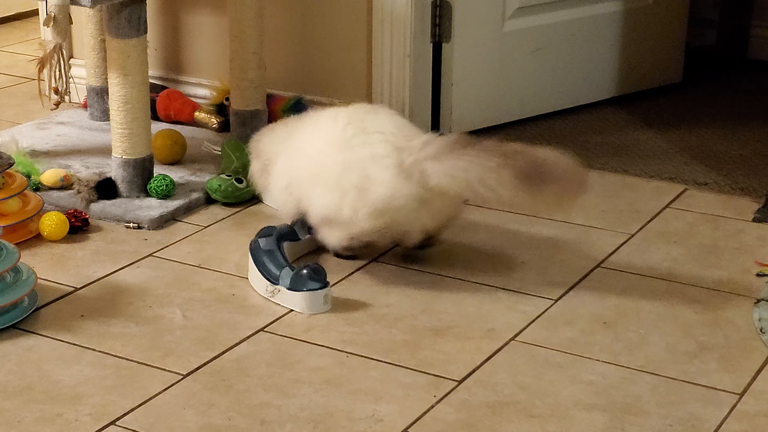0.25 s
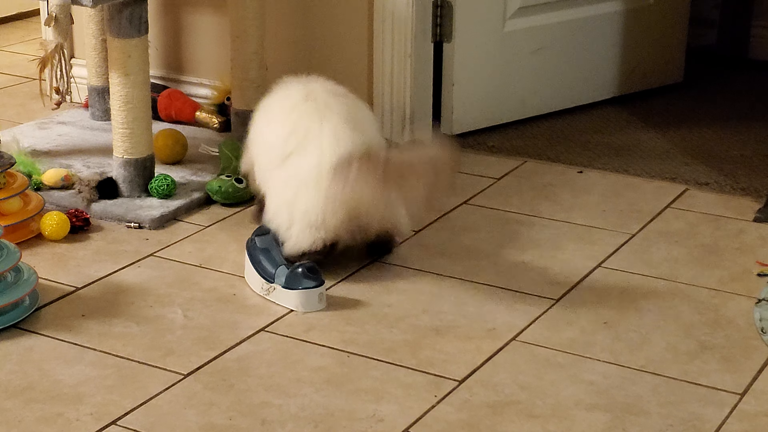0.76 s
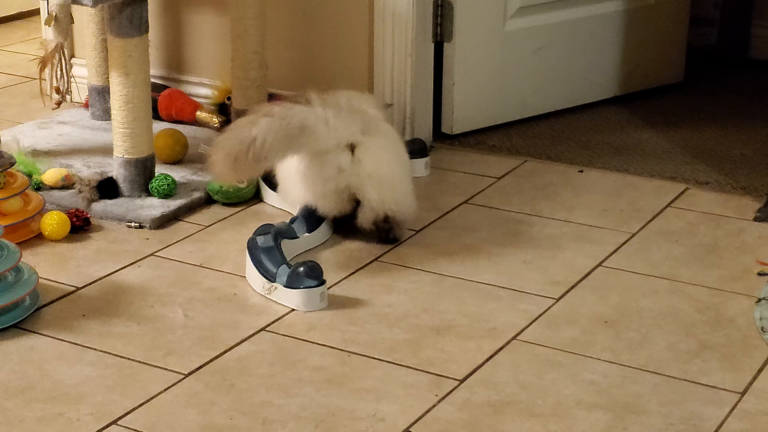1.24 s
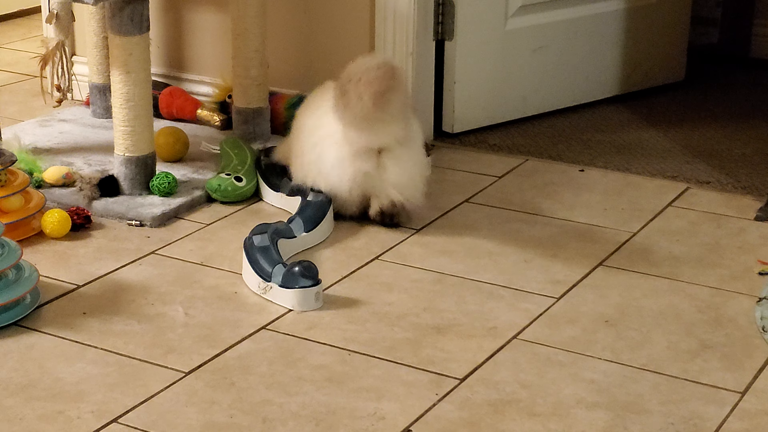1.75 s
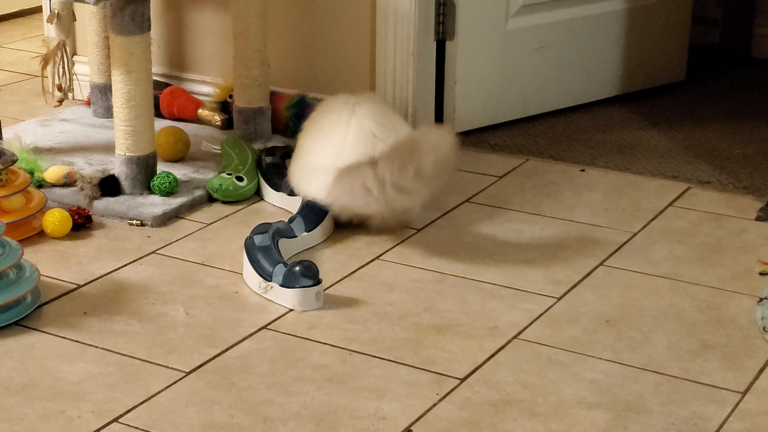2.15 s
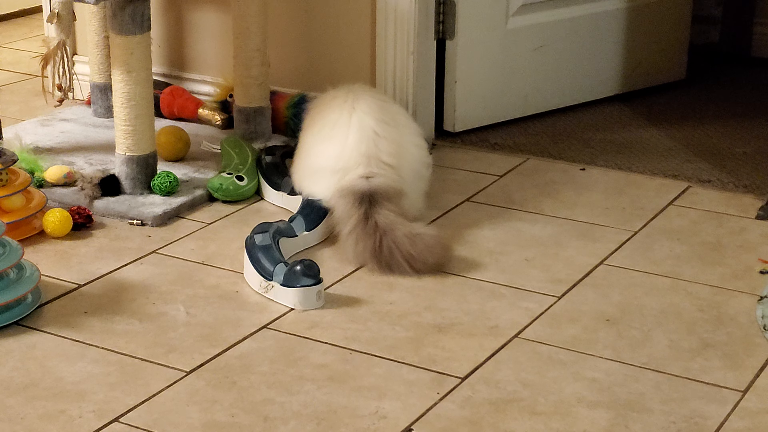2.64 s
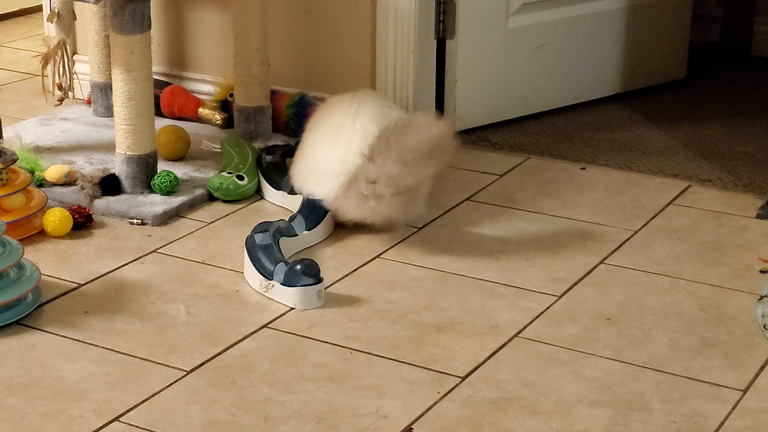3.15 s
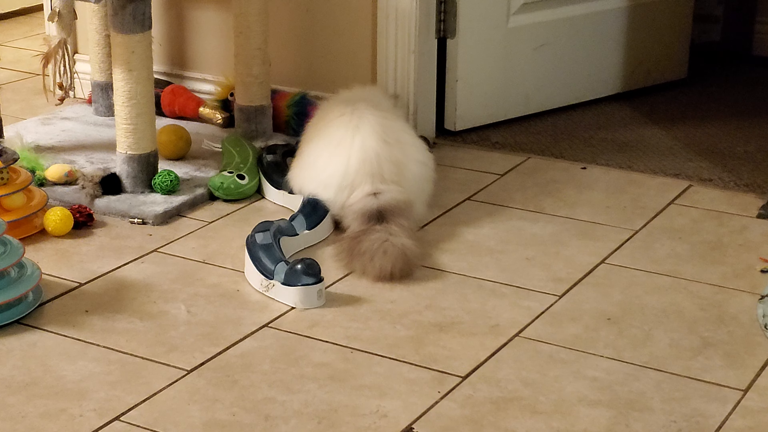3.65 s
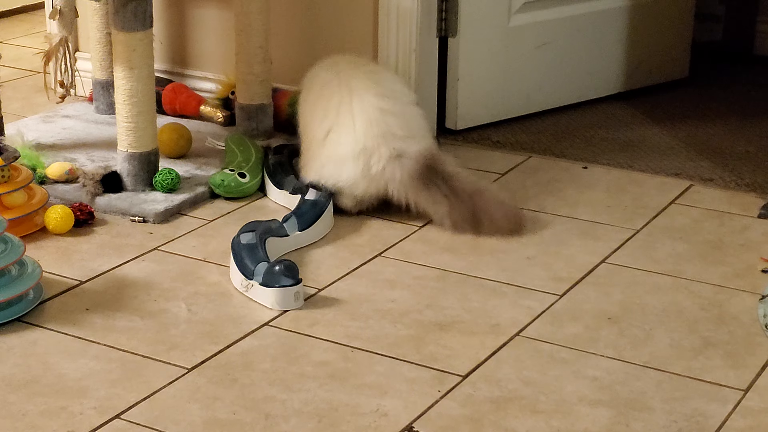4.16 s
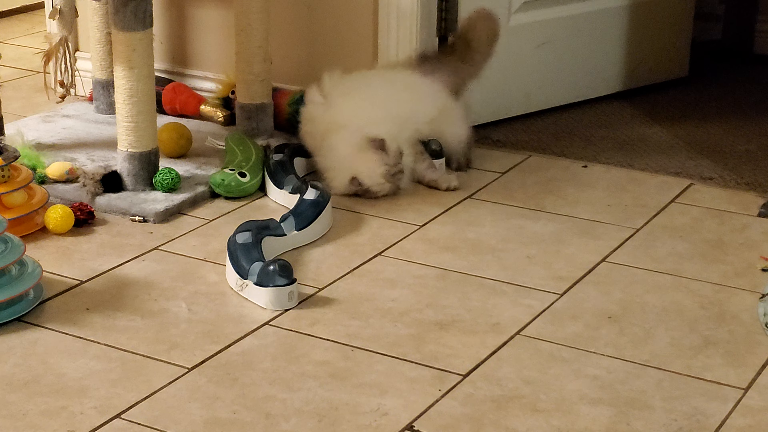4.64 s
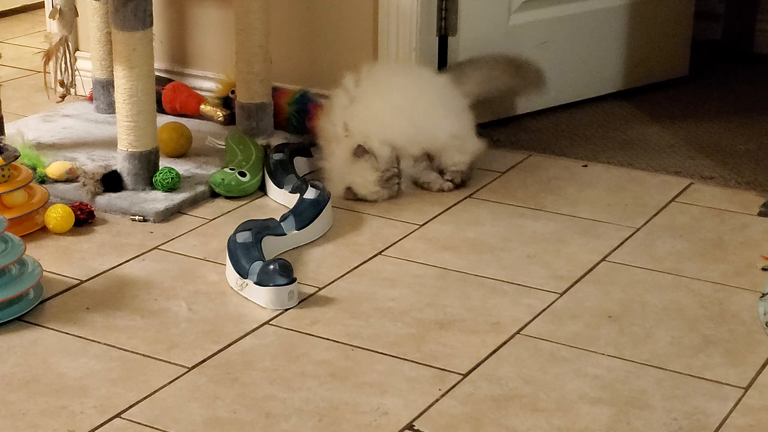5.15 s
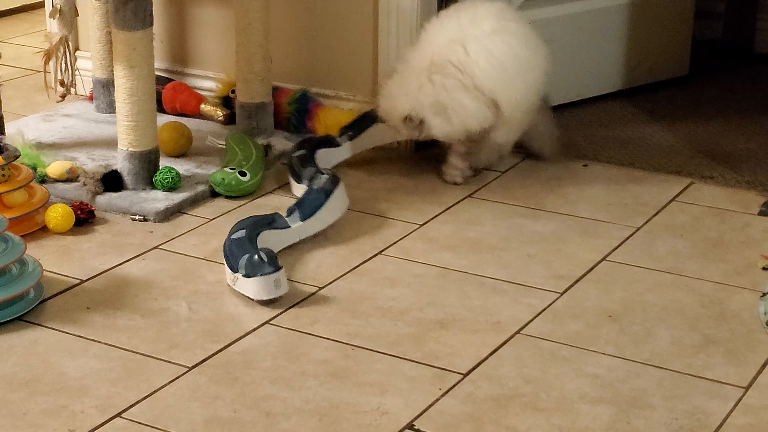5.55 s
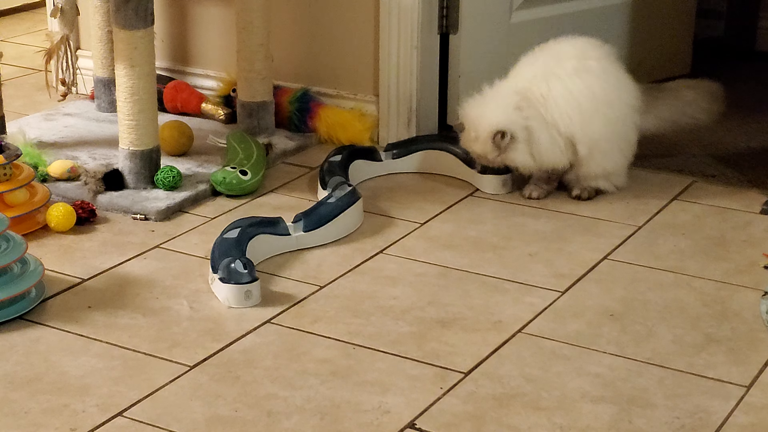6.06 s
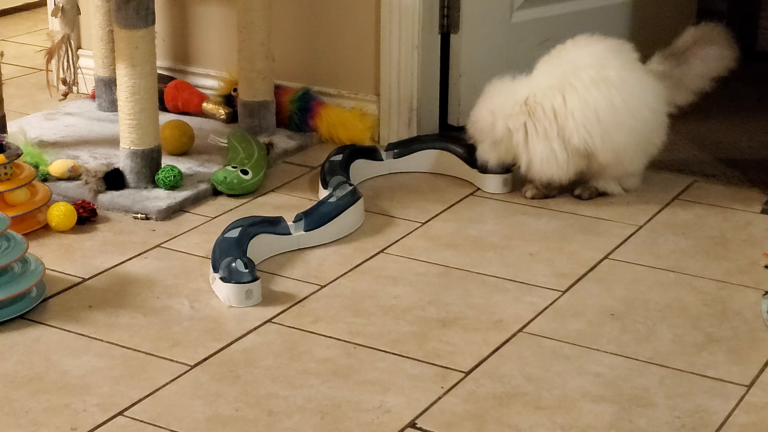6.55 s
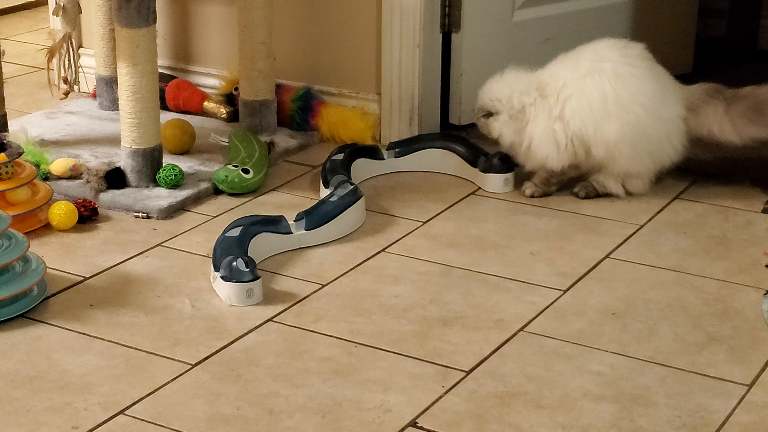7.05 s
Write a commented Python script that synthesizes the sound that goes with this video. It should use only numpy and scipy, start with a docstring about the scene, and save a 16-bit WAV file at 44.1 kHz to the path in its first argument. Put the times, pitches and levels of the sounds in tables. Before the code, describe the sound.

A kitten bats a hollow ball around a plastic track toy on a tiled floor. Quick clacks and short rolls mix with scrapes and a tiny squeak as the track is shoved. The play drops to light ticks, then several sharp, louder knocks arrive past the middle before it thins to soft taps. The microphone is a few metres away in a hard, slightly echoing room, where an appliance hums faintly.

```python
"""A hollow ball knocks around a plastic track toy, batted by a kitten a few metres from the microphone.
Each impact excites the damped resonances of the shell, and the ball rumbles along its channel.
When shoved, the track scrapes and squeaks over the floor tiles by stick-slip friction.
Reverberation in the hard room smears every sound; an appliance hums quietly behind it all."""
import sys
import numpy as np
from scipy import signal
from scipy.fft import rfft, irfft
from scipy.io import wavfile
from scipy.ndimage import uniform_filter1d

SR = 44100
rng = np.random.default_rng(int(sys.argv[2]) if len(sys.argv) > 2 else 0)


def to_wav(s):
    """Save 16-bit WAV."""
    ch = np.atleast_2d(s).T  # columns
    pcm = np.round(np.clip(ch, -1, 1) * 32767)  # PCM
    wavfile.write(sys.argv[1], SR, pcm.astype(np.int16))


N = 321930

# Tones of the appliance. Each row: frequency in Hz, level in dB.
HUM_TONES = [(59, -69), (117.7, -67), (177.6, -72), (398.4, -74.5), (705, -60)]
# Spectra of moving air, scraping, rolling and knocking. Each row: frequency in Hz, relative level in dB.
AIR_SPECTRUM = [(20, -41.5), (32, -22), (45, -10.5), (60, -0.5), (85, -18.5), (130, -8.5), (180, -12.5),
                (260, -8), (420, -10.5), (700, -15), (1200, -24.5), (1800, -32.5), (3300, -41), (4900, -39),
                (5600, -51.5), (8000, -54), (15000, -49)]
SCRAPE_SPECTRUM = [(80, -19), (500, -9.5), (1000, -0.5), (1600, -5.5), (2600, -0.5), (4700, -2.5),
                   (5600, -11.5), (6800, -13), (7900, -22.5), (10000, -19.5), (15500, -26.5)]
ROLL_SPECTRUM = [(60, -28.5), (200, -7), (450, -8.5), (650, 1), (1000, -1), (1500, -0.5), (2400, -8),
                 (3200, -15), (4800, -19), (5800, -37), (15000, -47)]
KNOCK_SPECTRUM = [(40, -12.5), (120, -5.5), (300, -5), (520, 0.5), (780, 2), (1200, 4.5), (2400, 1),
                  (3500, 0.5), (4800, -6), (5600, -11), (8000, -12), (10000, -11.5), (15500, -21.5)]
# Resonances of the hollow track. Each row: frequency in Hz, width in Hz, boost in dB.
SHELL_MODES = [(960, 15, 7.5), (949, 29, 1), (1070, 70, 1.5), (1384, 29, 6), (1532, 40, 2), (1647, 95, 3),
               (1823, 53, 1.5), (1972, 220, 5), (2200, 74, 2.5), (2382, 84, 5), (2780, 26, 1.5),
               (3077, 90, 1.5), (3240, 34, -0.5), (3600, 120, -1.5), (3975, 110, 0.5)]
# Shoves of the track, its squeaks, and runs of the ball along the channel; the shove row at 0.32 s is instead
# the bright grit that rides on the ball's rattle. Each row: start in seconds, length in seconds, first level in
# dB, last level in dB.
SHOVES = [(0.135, 0.11, -55, -42), (0.32, 0.13, -37.5, -55), (0.59, 0.11, -46.5, -40),
          (0.72, 0.1, -52.5, -48), (0.79, .12, -47, -32), (1.005, 0.038, -34, -35),
          (1.085, 0.067, -37.5, -34.5), (1.395, 0.1, -62, -44.5), (1.71, 0.079, -43.5, -47.5),
          (2.23, 0.21, -52.5, -68), (2.46, 0.12, -67, -57.5), (3.935, 0.09, -59, -53),
          (4.262, .05, -34, -38.5), (4.502, 0.051, -28, -36)]
SLIDE_SQUEAKS = [(0.819, 0.019, -41, -47.5), (0.877, 0.019, -37, -36)]
BALL_RUNS = [(0, 0.078, -36.5, -63), (0.12, .1, -48, -45), (0.305, 0.12, -34.5, -37),
             (0.45, 0.044, -40, -46), (0.6, 0.4, -45, -49.5), (1.25, 0.16, -55.5, -56),
             (1.415, 0.1, -47, -42), (2.01, 0.061, -54, -52), (2.235, 0.1, -38, -68),
             (2.455, 0.086, -39, -53), (2.75, 0.17, -63, -57), (3.57, 0.13, -70, -52),
             (3.87, 0.26, -58.5, -41.5), (5.5, 0.071, -38.5, -32), (5.75, 0.33, -48.5, -49.5),
             (6.38, 0.22, -51.5, -60), (6.83, 0.092, -64.5, -58.5), (6.93, .1, -64, -62.5)]
# Impacts of ball and track. Each row: start in seconds, relative peak level in dB, hollow ring in Hz,
# its boost in dB, thud (gain of the lows) in dB, edge (gain of the highs) in dB.
IMPACTS = [(0.315, -23.5, 827, 12.5, -16, -16.5), (0.357, -21, 854, 11, -12, -20),
           (0.408, -23.5, 900, 16, -13.5, -10.5), (0.451, -23, 1530, 9, -24, -19.5),
           (0.997, -26, 3000, -2, -18, -8.5), (1.092, -22, 2110, 9.5, -17.5, -9.5),
           (1.114, -26, 1510, 9, -9.5, -5.5), (1.341, -39, 1930, 11, -3, -10.5),
           (1.722, -36.5, 1450, 9, 0, -8), (1.745, -32.5, 1523, 2, -14, -7.5),
           (1.771, -30, 2030, 3.5, -16, -26), (2.012, -41.5, 1084, 13, -24, -10),
           (2.242, -39.5, 1490, 16, -16, -10), (2.461, -34.5, 970, 5.5, -6.5, -16),
           (2.482, -39, 990, 11.5, -7, -9), (2.619, -44.5, 1470, 14.5, -20, -10),
           (2.836, -36, 1390, 4.5, -11.5, -15.5), (3.091, -45, 1210, 7, -10, -34),
           (3.633, -44.5, 1270, 10, -22.5, -17.5), (3.747, -40, 1380, 7.5, -5, -14),
           (3.868, -45.5, 991, 9.5, -27.5, -29.5), (4.074, -22, 2050, 5.5, -20.5, -12),
           (4.269, -13, 1320, 3.5, -17.5, -13), (4.51, -11.5, 1250, 1, -15.5, -9.5),
           (5.433, -40, 950, 1.5, -9, -12.5), (5.508, -33, 1850, -5.5, -12, -23),
           (5.53, -27.5, 1080, -3, -11, -17.5), (5.66, -15, 1020, 15, -18, -11),
           (5.82, -32.5, 1360, 2, -12, -17), (5.85, -35.5, 2120, 11.5, -15, -13),
           (5.929, -35, 1660, 4.5, -14, -12), (5.988, -9.5, 1480, 3, -20, -10),
           (6.032, -18, 1420, -2, -21, -11.5), (6.449, -44, 816, 0, -11.5, -21),
           (6.496, -42, 1060, 5, -14, -16), (6.616, -44.5, 1124, 14, -5, -17.5),
           (7.029, -38.5, 3280, 0, -10, -11), (7.069, -39.5, 1030, 7, -8, -9.5)]
# Likeness of the two channels in a diffuse field. Each row: frequency in Hz, correlation from 0 to 1.
CORRELATION = [(60, 0.6), (150, 1), (350, 0.75), (700, 0.2), (1400, 0), (3000, 0.05), (12000, 0.2)]
# Balance of the microphone ports. Each row: frequency in Hz, left minus right in dB.
PORT_BALANCE = [(60, -6.5), (300, -2), (700, -5.5), (1400, 0.5), (3000, -1), (3900, -4.5), (4700, -11),
                (6000, 5.5), (9000, -2.5), (13000, -4)]


def undb(db):
    """Amplitude grows tenfold for every 20 dB."""
    return 10 ** (np.asarray(db) / 20)


def unit(x):
    """Normalisation to an rms of 1."""
    return x / np.sqrt(np.mean(x ** 2))


def freqs(size):
    """Fourier bin frequencies in Hz, floored at 1."""
    return np.maximum(np.arange(size // 2 + 1) * SR / size, 1)


def along(points, f):
    """Interpolation of (Hz, value) points on a log-frequency axis."""
    hz, value = np.transpose(points)
    return np.interp(np.log(f), np.log(hz), value)


def tint(x, db):
    """Zero-phase filtering by a gain in dB at each frequency."""
    return irfft(rfft(x) * undb(db), x.shape[-1])


def minimum_phase(db):
    """The minimum-phase response of a spectrum delivers its energy as early as causality allows."""
    cepstrum = irfft(np.log(undb(db)))
    half = len(cepstrum) // 2
    cepstrum[1:half] *= 2
    cepstrum[half + 1:] = 0
    return irfft(np.exp(rfft(cepstrum)))


def bell(f, hz, width_hz):
    """Lorentzian resonance curve, 1 at its centre."""
    return 1 / (1 + (2 * (f - hz) / width_hz) ** 2)


def diffuse_noise(size):
    """A diffuse field is alike in both channels at long wavelengths, nearly unrelated at short ones."""
    correlation = np.clip(along(CORRELATION, freqs(size)), 0, 1)
    mid, side = rfft(rng.standard_normal((2, size)))
    mid *= np.sqrt((1 + correlation) / 2)
    side *= np.sqrt((1 - correlation) / 2)
    return irfft(np.array([mid + side, mid - side]), size)


def appliance(air_db=-58.5, drone_hz=226.2, drone_db=-60, waver=0.033):
    """Mains hum and a thin motor whine superpose on a fan's narrow-band drone and broadband rush of air."""
    t, f = np.arange(N) / SR, freqs(N)
    out = undb(air_db) * unit(tint(diffuse_noise(N), along(AIR_SPECTRUM, f)))
    drone = irfft(rfft(diffuse_noise(N)) * bell(f, drone_hz, width_hz=24), N)
    out += undb(drone_db) * unit(drone)
    slow_band = np.exp(-f / 2)
    for hz, db in HUM_TONES:
        swell, drift = (unit(irfft(rfft(rng.standard_normal(N)) * slow_band, N)) for _ in range(2))
        out += np.sqrt(2) * undb(db) * (1 + waver * swell) * np.sin(2 * np.pi * hz * t + waver * drift)
    return out


def room(wet_db, early_db, early_s=0.014, bass_hz=450, treble_t60_s=0.41, bass_t60_s=0.81):
    """A room's impulse response: direct sound, early reflections and an exponentially decaying tail."""
    size = 2 ** 15
    t, f = np.arange(size) / SR, freqs(size)
    noise = diffuse_noise(size)
    bass = irfft(rfft(noise) / (1 + (f / bass_hz) ** 4))
    tail = (noise - bass) * undb(-60 * t / treble_t60_s) + bass * undb(-60 * t / bass_t60_s)
    tail *= 1 - np.exp(-t / 0.0015)
    path = undb(wet_db) * unit(tail) / np.sqrt(size)
    path[[0, 1], rng.integers(0, 3, size=2)] += 1  # direct sound, from nearly straight ahead
    for share in rng.uniform(0.1, 1, size=6):  # wall, door and tiles, reaching the ears a little apart
        path[[0, 1], int(share * early_s * SR) + rng.integers(0, 16, size=2)] += undb(early_db)
    return path


def track_resonance(f, unevenness_db):
    """Modal response of the track in dB: each mode's strength depends on the point of contact."""
    return sum((db + unevenness_db * rng.uniform(-0.92, 1)) * bell(f, hz, width_hz)
               for hz, width_hz, db in SHELL_MODES)


def strokes(rows, rise_s, fall_s):
    """Amplitude envelope: each stroke sets in, swells or fades exponentially, and lets go."""
    t = np.arange(N) / SR
    gain = np.zeros(N)
    for start, length, first_db, last_db in rows:
        on = (t > start) & (t < start + length)
        age = t[on] - start
        gate = np.minimum(age / rise_s, 1) ** 2 * np.minimum((length - age) / fall_s, 1)
        gain[on] += gate * undb(first_db + (last_db - first_db) * age / length)
    return gain


def rub(envelope, spectrum, ring, rate_hz, spread_db, wet_db):
    """Shot noise: tiny random contacts drive the track's modes and one added ring (Hz, width Hz, dB)."""
    f = freqs(2048)
    ring_hz, width_hz, ring_db = ring
    strengths = undb(spread_db * np.minimum(rng.exponential(size=N), 4)) * rng.choice([-1, 1], N)
    contacts = unit((rng.random(N) < rate_hz / SR) * strengths)
    resonance_db = track_resonance(f, unevenness_db=3) + ring_db * bell(f, ring_hz, width_hz)
    shell = minimum_phase(along(spectrum, f) + resonance_db)
    path = signal.fftconvolve(shell[None], room(wet_db, early_db=-11), axes=1)
    path /= np.sqrt(np.sum(path ** 2) / 2)
    return signal.fftconvolve((contacts * envelope)[None], path, axes=1)[:, :N]


def scraping():
    """Stick-slip friction of the track's feet on gritty tiles; briefly the slips lock into a squeak. The same
    grit also brightens the ball's rattle at 0.32 s."""
    grit = rub(strokes(SHOVES, rise_s=0.017, fall_s=0.025), SCRAPE_SPECTRUM,
               ring=(2600, 500, 1), rate_hz=890, spread_db=4, wet_db=3.5)
    squeak = rub(strokes(SLIDE_SQUEAKS, rise_s=0.0096, fall_s=0.0096), SCRAPE_SPECTRUM,
                 ring=(4440, 400, 34), rate_hz=3000, spread_db=1, wet_db=-7)
    return grit + squeak


def rolling():
    """Roughness excites rolling noise: the hollow ball bumps over the ribs and seams of its channel."""
    return rub(strokes(BALL_RUNS, rise_s=0.01, fall_s=0.01), ROLL_SPECTRUM,
               ring=(1080, 170, 6), rate_hz=260, spread_db=4.5, wet_db=8.5)


def chatter(t, decay_s=0.00091, evenness=0.58):
    """Contact chatter of ball and loose joints spreads a click into a short, partly whitened burst."""
    spectrum = rfft(rng.standard_normal(len(t)) * t * np.exp(-t / decay_s))
    ripple_db = 20 * np.log10(np.abs(spectrum) / np.abs(spectrum).max() + 0.001)
    whitening = rfft(minimum_phase(-evenness * ripple_db))
    return irfft(spectrum * whitening)[:len(t) // 4]


def contact_spectrum(f, peak_db, thud_db, edge_db, body_db=-12):
    """Impact spectrum in dB: only strong blows thump the floor, and harder contact adds top treble."""
    strongest_db = max(row[1] for row in IMPACTS)
    thump_db = thud_db + 0.37 * (peak_db - strongest_db)
    snap_db = -31.5 + 1.5 * (edge_db - body_db)
    return along([(280, thump_db), (520, thud_db), (950, thud_db), (1200, body_db), (2200, body_db),
                  (2850, edge_db), (4950, edge_db), (5700, (edge_db + snap_db) / 2), (7400, snap_db)], f)


def knocks(gain_db=-10, rim_hz=2587, rebound_s=0.016, rebound_db=-10):
    """Impact sets the plastic shell into damped free vibration; the ball rebounds once, more weakly."""
    size = 4096
    t, f = np.arange(size) / SR, freqs(size)
    out = np.zeros((2, N + SR))
    for start_s, peak_db, ring_hz, ring_db, thud_db, edge_db in IMPACTS:
        # the struck part favours one hollow ring and one thin ring of the rim
        hollow_db = ring_db * bell(f, ring_hz, width_hz=0.37 * ring_hz)
        rim_db = 2 * bell(f, rim_hz * rng.uniform(0.95, 1.05), width_hz=270)
        drive_db = along(KNOCK_SPECTRUM, f) + contact_spectrum(f, peak_db, thud_db, edge_db)
        shell = minimum_phase(drive_db + track_resonance(f, unevenness_db=-0.5) + hollow_db + rim_db)
        path = room(wet_db=9, early_db=-6)
        for delay_s, drop_db in [(0, 0), (rebound_s * rng.uniform(0.5, 1.5), rebound_db)]:
            blow = signal.fftconvolve(chatter(t), shell)
            peak_rms = np.sqrt(uniform_filter1d(blow ** 2, size=160).max())
            blow *= undb(peak_db + drop_db + gain_db) / peak_rms
            heard = signal.fftconvolve(blow[None], path, axes=1)
            start = int((start_s + delay_s) * SR)
            out[:, start:start + heard.shape[1]] += heard
    return out[:, :N]


def scene():
    """Superposition: the sound pressures of the toy and the appliance add."""
    return knocks() + rolling() + scraping() + appliance()


def record(dry, cutoff_hz=15850):
    """The two microphone ports differ in frequency response; a steep low-pass limits the bandwidth."""
    lean_db = along(PORT_BALANCE, freqs(N)) / 2
    coloured = tint(dry, np.array([lean_db, -lean_db]))
    lowpass = signal.ellip(10, 0.2, 70, cutoff_hz, fs=SR, output="sos")
    return signal.sosfilt(lowpass, coloured)


dry = scene()
out = record(dry)
to_wav(out)
```